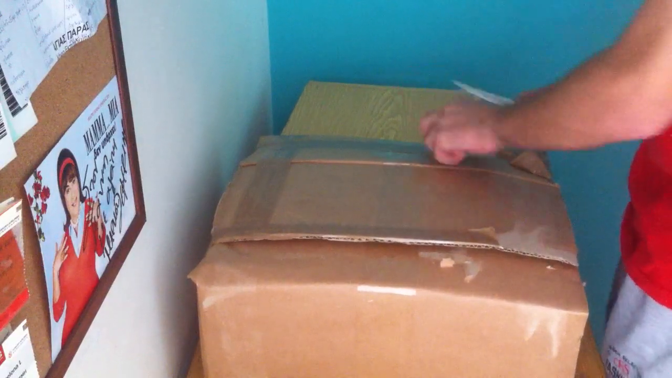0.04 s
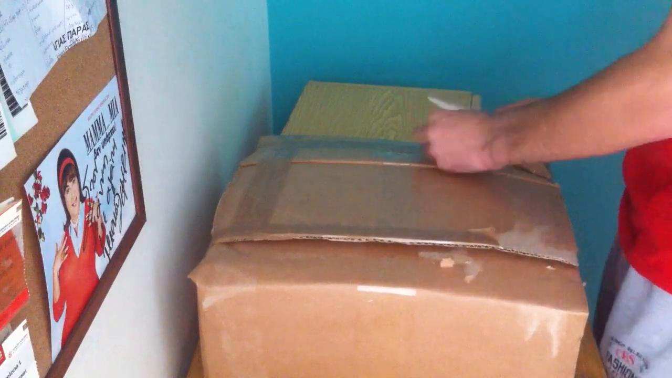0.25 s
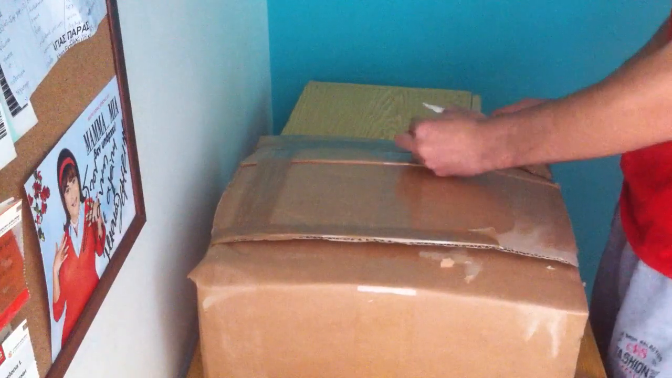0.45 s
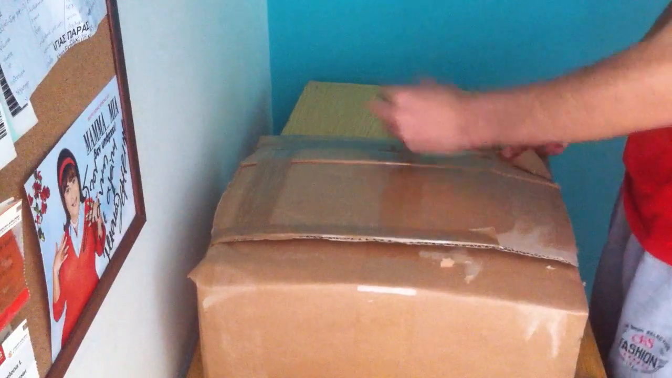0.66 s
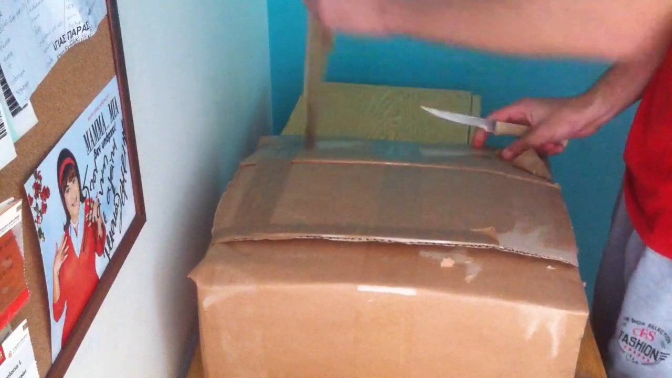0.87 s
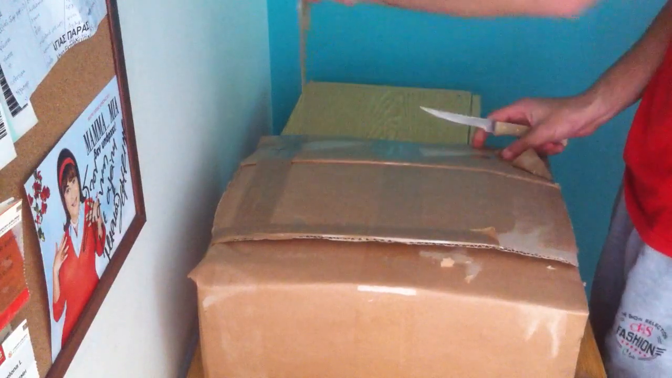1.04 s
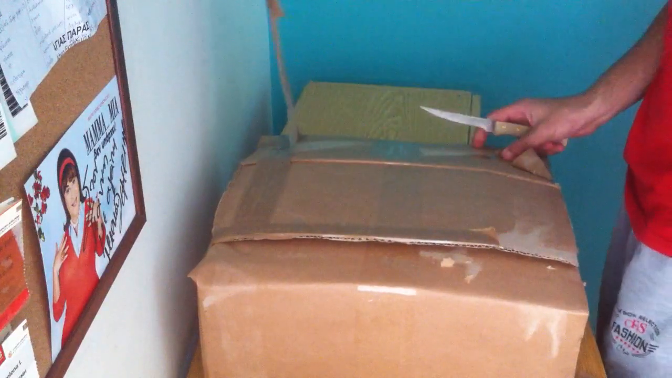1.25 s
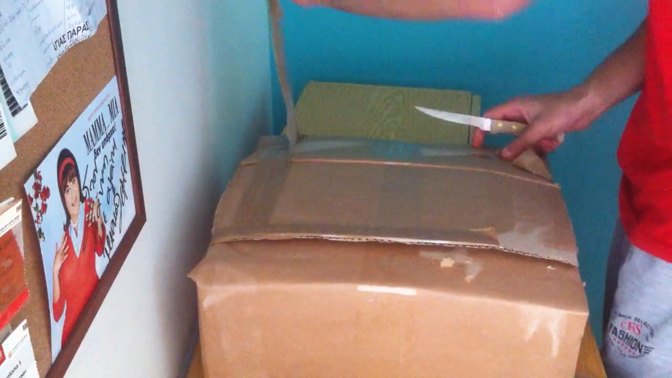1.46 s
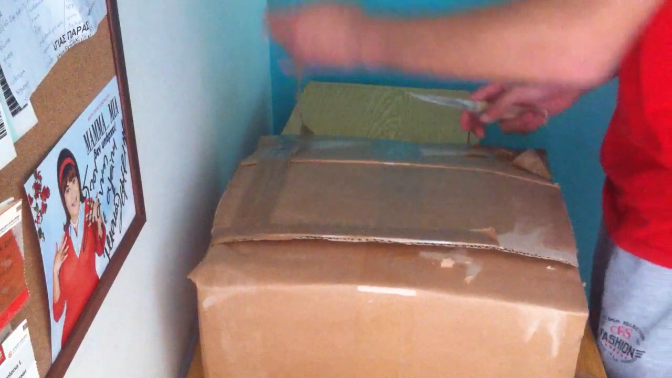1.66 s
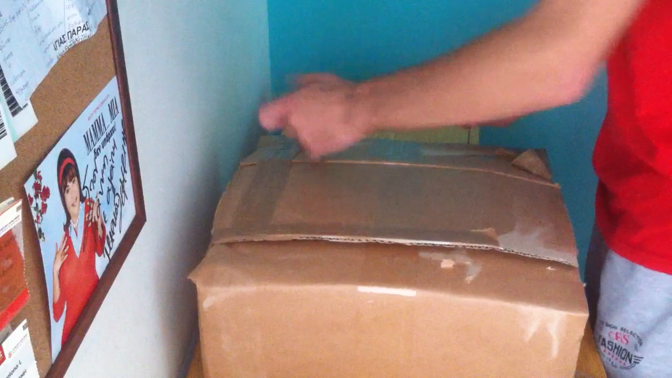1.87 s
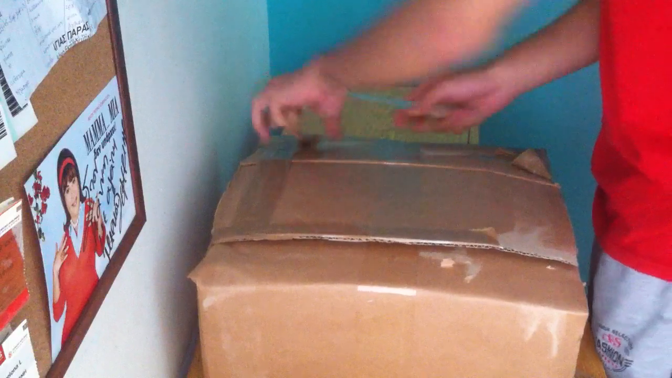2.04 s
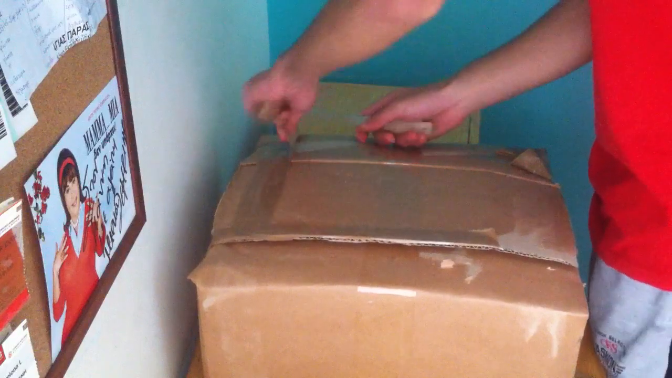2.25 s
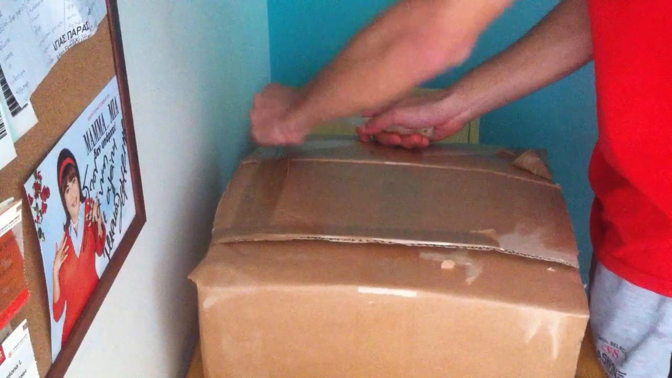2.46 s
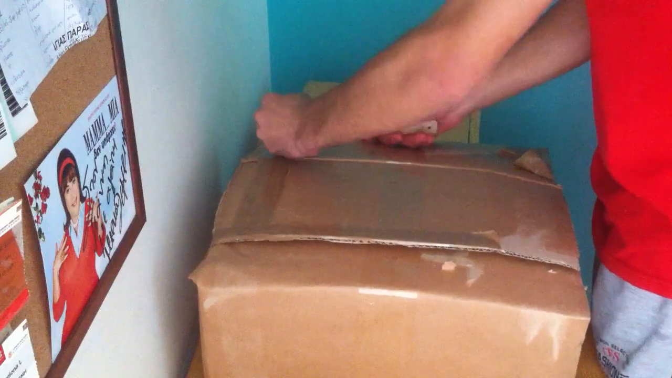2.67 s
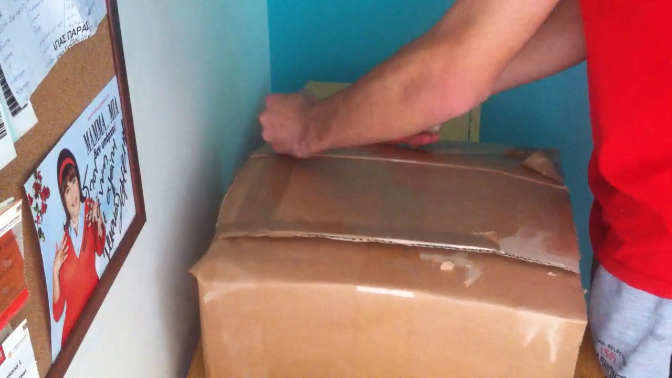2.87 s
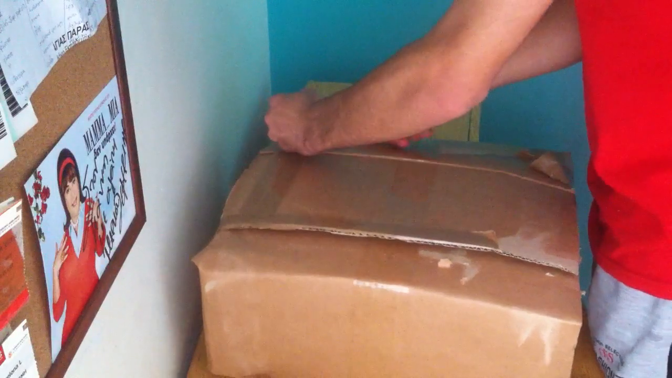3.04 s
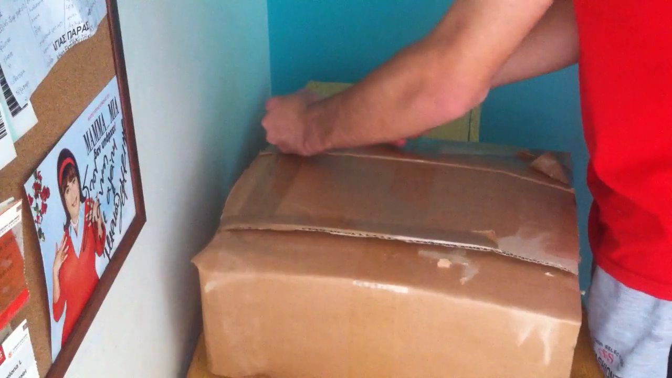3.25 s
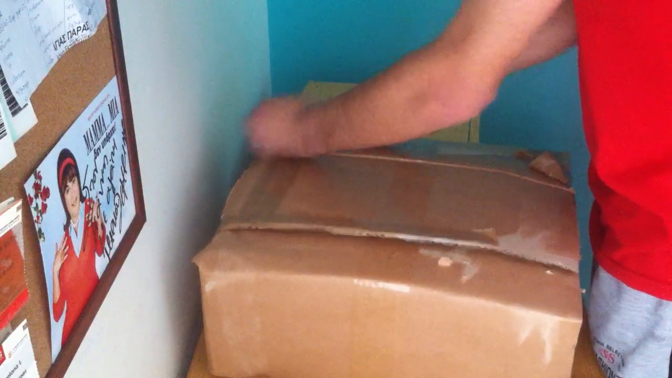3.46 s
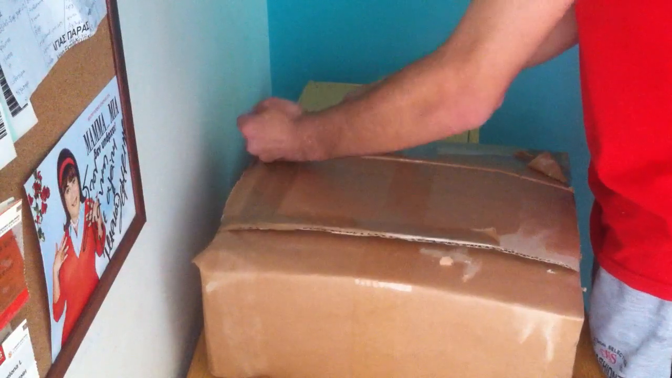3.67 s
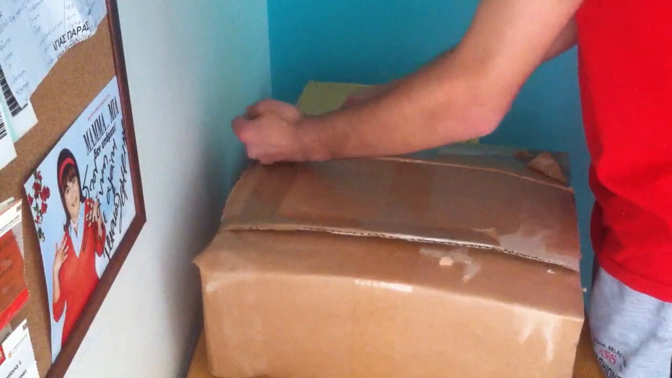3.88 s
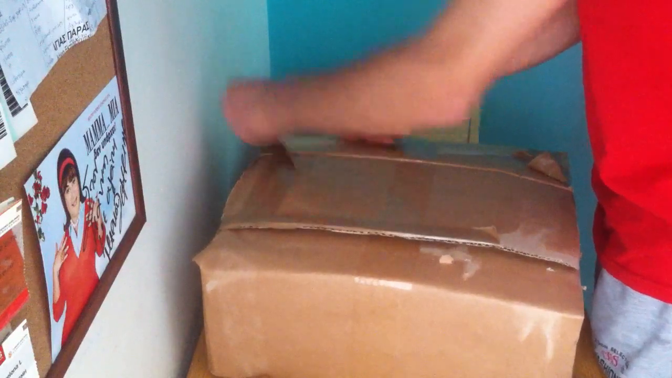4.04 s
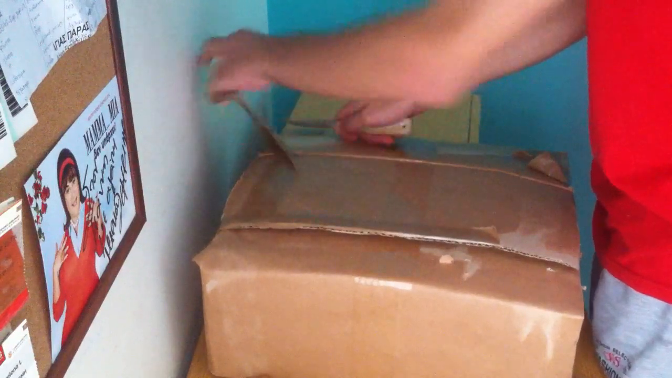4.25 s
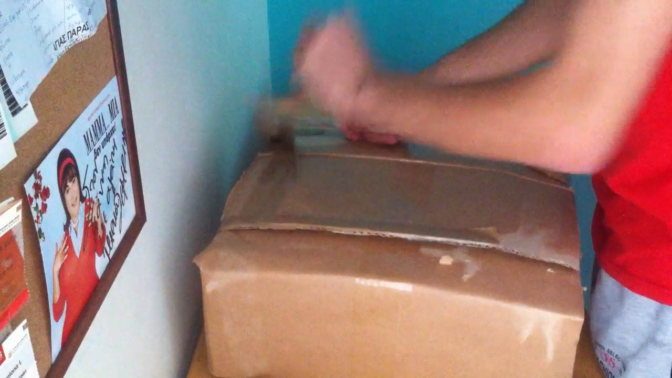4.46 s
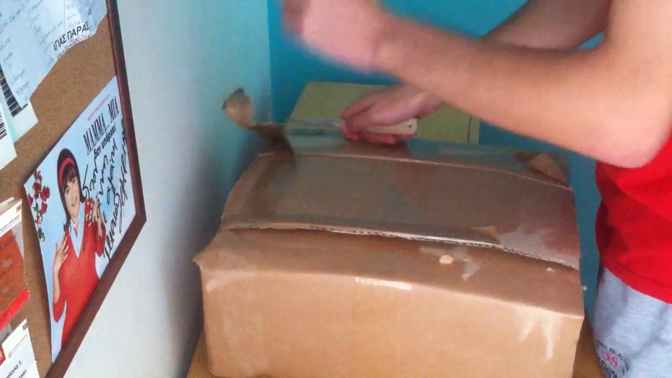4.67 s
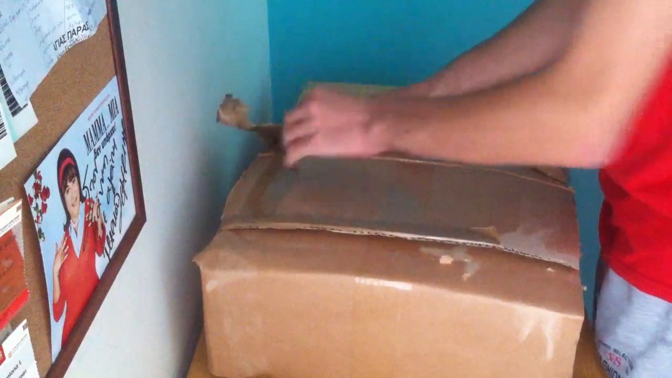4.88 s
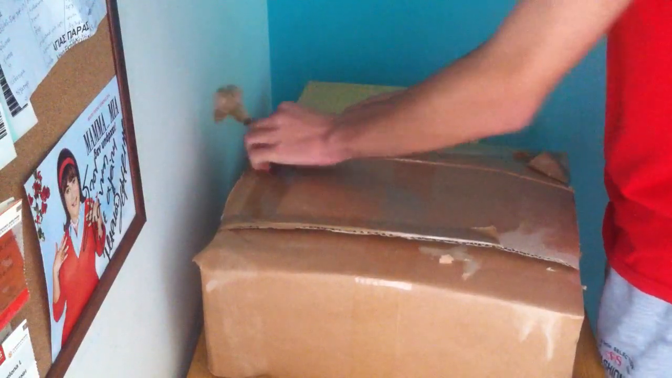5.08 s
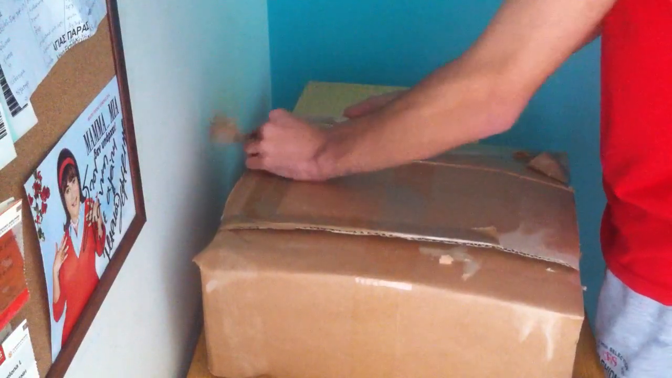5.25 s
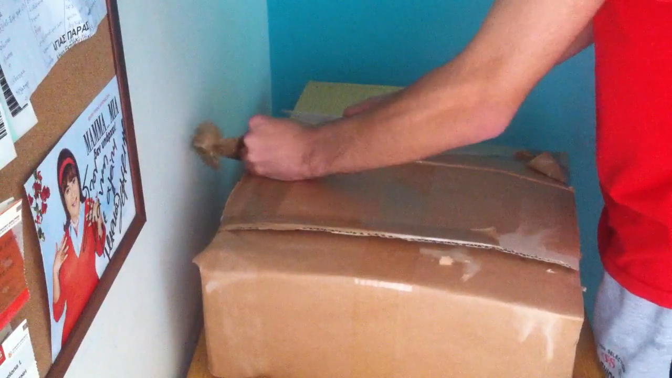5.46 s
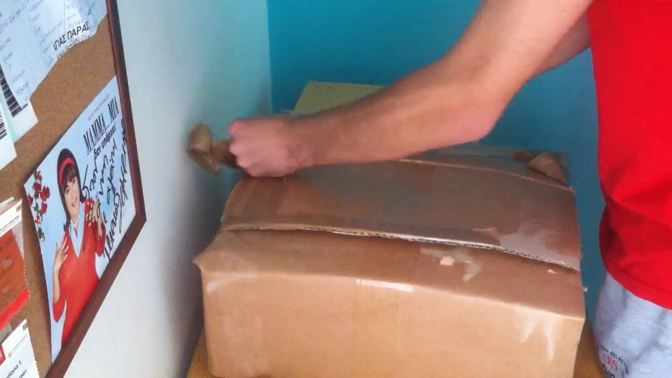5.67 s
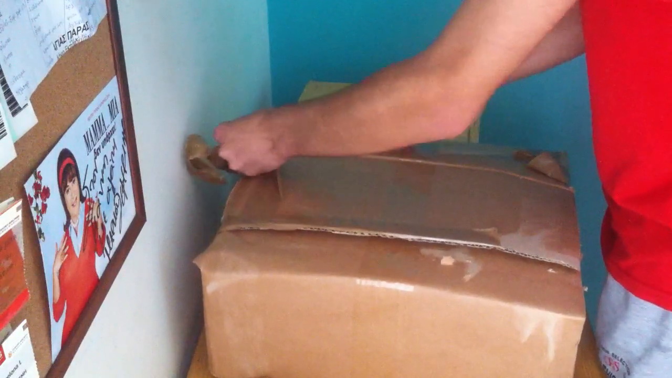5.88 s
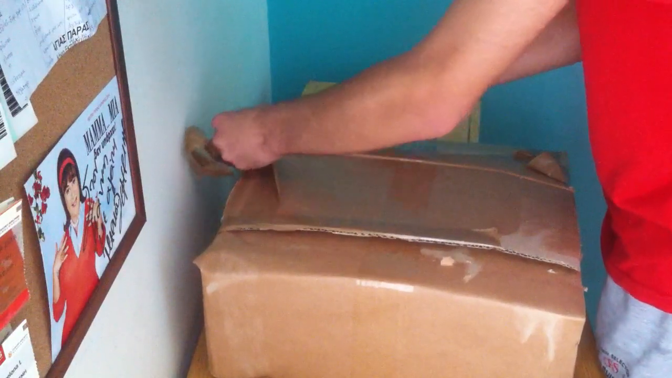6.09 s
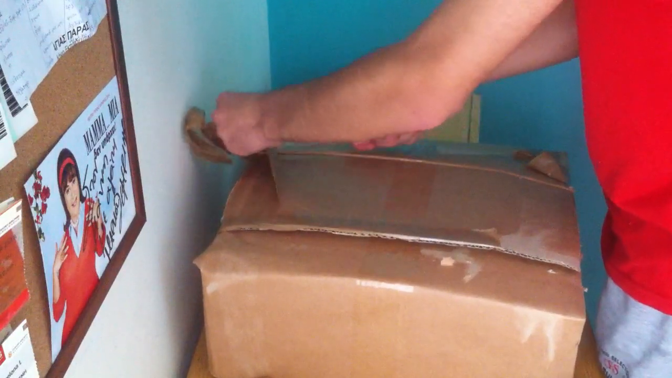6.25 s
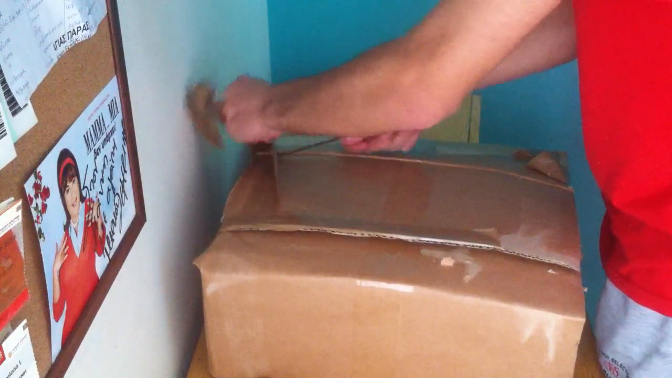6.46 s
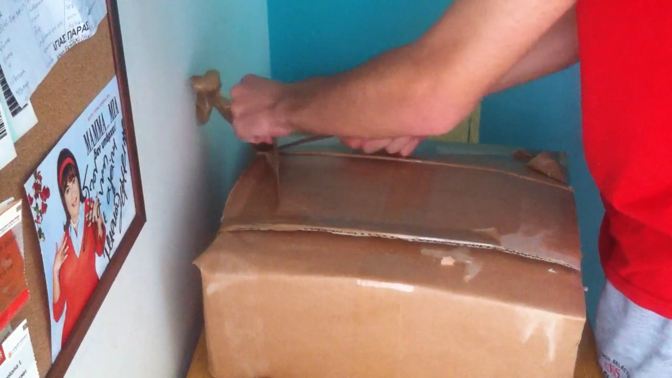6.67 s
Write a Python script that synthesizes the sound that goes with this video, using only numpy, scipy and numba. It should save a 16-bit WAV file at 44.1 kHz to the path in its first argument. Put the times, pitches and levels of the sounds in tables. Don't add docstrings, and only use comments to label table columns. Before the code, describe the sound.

A sticky strip rasps off a hollow carton, first moderately, then in a harsh burst with cracking snaps. A tiny high squeak and hand slides fill a quieter spell of little crackles. Midway a single loud snap slams the box. Afterwards short rips, sharp ticks and muffled finger bumps come irregularly. Close small microphone, thin lows, light hiss, short ring from bare walls.

```python
import sys
import numpy as np
from scipy import signal
from scipy.fft import rfft, irfft
from scipy.io import wavfile
from numba import njit

SR = 44100
rng = np.random.default_rng(int(sys.argv[2]) if len(sys.argv) > 2 else 0)


def decibels_to_gain(level_db):
    exponent = np.asarray(level_db, float) / 20
    return 10 ** exponent


def wav_out(sig):
    wavfile.write(sys.argv[1], SR, np.round(np.clip(np.atleast_2d(sig).T, -1, 1) * 32767).astype(np.int16))


N = 296352


def rms_one(x):
    return x / np.sqrt(np.mean(x ** 2) + 1e-20)


def at_hz(points, hz):
    curve_hz, values = np.transpose(points)
    return np.interp(np.log(hz), np.log(curve_hz), values)


def bank(x, spectrum):
    size = 8192
    hz = np.arange(1, size // 2 + 2) * SR / size
    cepstrum = irfft(np.log(decibels_to_gain(at_hz(spectrum, hz))))
    cepstrum[1:size // 2] *= 2
    cepstrum[size // 2 + 1:] = 0
    response = irfft(np.exp(rfft(cepstrum)))
    return signal.oaconvolve(x, response)[:len(x)]


@njit
def glide(x, r, turn):
    y = np.zeros(len(x))
    for i in range(2, len(x)):
        y[i] = x[i] - x[i - 2] + 2 * r[i] * turn[i] * y[i - 1] - r[i] * r[i] * y[i - 2]
    return y


def resonance(x, hz, width_hz):
    r = np.exp(-np.pi * width_hz / SR) * np.ones(len(x))
    turn = np.cos(2 * np.pi * hz / SR) * np.ones(len(x))
    return glide((1 - r * r) / 2 * x, r, turn)


def hush():
    # (pitch_hz, level_db per Hz)
    hush_spectrum = [(12, -25), (20, -9), (34, -5), (53, -24), (134, 3), (234, 4.5), (301, -1), (759, -3.5),
                     (949, -6), (1260, -6.5), (5530, -11.5), (9400, -14), (10500, -16.5), (14700, -12.5),
                     (16000, -14.5)]
    hiss = bank(rng.standard_normal(N + SR), hush_spectrum)[SR:]
    return decibels_to_gain(-68.5) * rms_one(hiss)


def room(x):
    # (pitch_hz, time_to_fall_60_db_s)
    wall_decay = [(100, 0.82), (200, 0.34), (400, 0.24), (800, 0.33), (1840, 0.37), (4850, 0.34),
                  (12000, 0.3)]
    # (delay_s, level_db)
    bounces = [
        (.0026, -5),
        (.007, -5),
        (.013, -14.5),
        (0.018, -14.5),
        (0.045, -11.5),
    ]
    t = np.arange(SR + SR // 2) / SR
    hz, s, cells = signal.stft(rng.standard_normal(len(t)), SR, nperseg=512)
    hz = np.maximum(hz, 50)[:, None]
    decay_db = -60 * s / np.maximum(at_hz(wall_decay, hz), .05)
    tilt_db = -0.5 * np.log2(hz / 1000)
    tail = signal.istft(cells * decibels_to_gain(decay_db + tilt_db), SR, nperseg=512)[1][:len(t)]

    early = np.zeros(len(t))
    scatters = rng.standard_normal((len(bounces), SR // 50))
    for (delay_s, db), scatter in zip(bounces, scatters):
        i = round(delay_s * SR)
        smear = scatter * np.exp(-t[:len(scatter)] / 0.003)
        early[i:i + len(scatter)] += decibels_to_gain(db - 27.5) * smear
    response = decibels_to_gain(-30.0) * np.clip(t / 0.0017, 0, 1) * tail + early
    response[0] += .6
    return signal.fftconvolve(x, response)[:N]


def squeak():
    t = np.arange(N) / SR
    shape = np.exp(-((t - 1.705) / 0.012) ** 2)
    return decibels_to_gain(-67) * shape * rms_one(resonance(rng.standard_normal(N), 4070.0, 150))


def box(x, push_hz):
    # (pitch_hz, width_hz, level_db)
    panels = [(135.4, 35, -1), (173.35, 4.7, 7), (189, 17, 4), (258, 8.8, 7), (351.2, 55, -6),
              (447, 8.3, -32), (602, 74, 1.5)]
    pushed = resonance(x, push_hz, 200)
    out = decibels_to_gain(-4.5) * pushed
    for k, (hz, width_hz, db) in enumerate(panels):
        out += (-1) ** k * decibels_to_gain(db) * resonance(pushed, hz, max(width_hz, 8))
    return out


def strip(x, hz, width_hz, lid_db):
    ring = resonance(x, hz, width_hz)
    overtone = decibels_to_gain(-17.0) * resonance(x, 1.726 * hz, 2 * width_hz)
    lid = decibels_to_gain(lid_db) * resonance(x, 667.0, 170)
    flutter = decibels_to_gain(-11.5) * resonance(x, 1920.0, 1450)
    band = signal.butter(2, [300, 2300], "band", fs=SR, output="sos")
    return signal.sosfilt(band, ring + overtone + lid + flutter)


def dullness(crack_db):
    return np.clip((-40.5 - crack_db) / 16, 0, .9)


def crack(x, dull):
    # (pitch_hz, level_db per Hz)
    hard_release = [(450, -19.5), (900, -6.5), (1700, -8.5), (2700, -7), (3600, -11), (5000, -15),
                    (6800, -24.5), (8300, -23), (10800, -34.5), (14000, -38.5), (16000, -54.5)]
    bright = bank(x, hard_release)
    soft = signal.sosfilt(signal.butter(2, 3300, fs=SR, output="sos"), bright)
    return dull * soft + (1 - dull) * bright


def stroke(t, start_s, length_s):
    rise = (t - start_s) / 0.1
    fall = (start_s + length_s - t) / 0.44
    return np.clip(np.minimum(rise, fall) / length_s, 0, 1) ** 2


def movements(t):
    # (time_s, pull_db, strip_ring_hz)
    long_pulls = [
        [(.31, -65, 820), (.35, -50, 730), (.426, -42.5, 700), (.49, -47, 740), (.54, -53, 736), (.6, -50, 700),
         (.75, -49, 670), (.775, -44, 780)],
        [(.77, -37, 780), (.82, -31, 806), (.86, -29.5, 800), (.92, -39.5, 900), (1.0, -44.5, 740),
         (1.13, -50, 780), (1.24, -48.5, 1770), (1.34, -55.5, 1800), (1.5, -75, 900)],
    ]
    # (start_s, length_s, pull_db, crackle_over_pull_db, strip_ring_hz)
    peels = [(0.21, 0.069, -56.5, -17, 1010), (1.824, 0.24, -80, 16, 900), (2.08, 0.13, -81, -8, 1350),
             (2.29, .16, -58.5, -3, 900), (2.407, 0.26, -62, 5.5, 900), (2.534, 0.28, -72, 14, 1150),
             (2.748, 0.22, -63, -20, 1000), (2.963, .18, -79, 16.5, 1260), (3.35, 0.5, -76, 7.5, 900),
             (3.589, 0.1, -43, 6, 640), (4.0, 0.1, -67.5, 4.5, 1300), (4.105, 0.097, -53, -15, 1020),
             (4.169, 0.082, -35.5, -27, 1000), (4.38, 0.32, -60.5, -25, 800), (4.572, 0.074, -43, -14, 756),
             (4.78, 0.078, -57, -13, 2010), (5.2, 0.23, -59, -9, 1100), (5.372, 0.18, -55.5, -3, 900),
             (5.571, 0.056, -53, -6, 1160), (5.627, 0.085, -47.5, -4, 670), (5.76, 0.23, -54, -5.5, 1670),
             (5.964, 0.11, -57, -6, 1130), (6.265, 0.062, -58, -9, 1040), (6.564, 0.11, -57.5, -8, 1050)]
    # (start_s, length_s, drumming_db, pushed_panel_hz)
    rubs = [(1.476, 0.069, -70, 215), (1.664, 0.12, -68, 232), (1.855, 0.42, -76, 200),
            (2.31, 0.066, -71, 140), (2.536, 0.056, -58, 300), (2.655, 0.033, -55, 330),
            (3.5, 0.3, -64, 325), (3.725, 0.16, -45, 173), (3.843, 0.2, -61, 170), (4.241, 0.1, -43, 323),
            (4.758, 0.05, -48, 400), (4.664, 0.11, -51.5, 160), (4.838, 0.12, -50, 145),
            (5.0, 0.078, -64, 179), (5.147, 0.029, -66, 228), (5.382, 0.27, -54.5, 294),
            (5.66, 0.047, -41.5, 272), (5.723, 0.1, -58, 256), (6.414, 0.061, -54.5, 287),
            (6.568, 0.081, -60.5, 297)]
    peel_drum_db, peel_push_hz = -2, 372
    rub_ring_db, rub_ring_hz = -32.5, 900.0
    for pull in long_pulls:
        s, db, hz = np.transpose(pull)
        db, hz = np.interp(t, s, db), np.interp(t, s, hz)
        fade = np.clip(np.minimum(t - s[0], s[-1] - t) / .012, 0, 1)
        yield fade, db + peel_drum_db, db, db - 5.5, hz, peel_push_hz
    for s, length_s, db, crackle_db, hz in peels:
        yield stroke(t, s, length_s), db + peel_drum_db, db, db + crackle_db, hz, peel_push_hz
    for s, length_s, db, hz in rubs:
        yield stroke(t, s, length_s), db, db + rub_ring_db, db + 3 * rub_ring_db, rub_ring_hz, hz


def ticks(per_s, spread_db, clump_db):
    slow = np.exp(-2 * np.pi * 30 / SR)
    clumps = rms_one(signal.lfilter([1], [1, -slow], rng.standard_normal(N)))
    born = rng.random(N) < per_s * decibels_to_gain(clump_db * clumps) / SR
    size_db = spread_db * np.minimum(rng.exponential(1, N), 4)
    return born * decibels_to_gain(size_db) * rng.choice([-1, 1], N) + 1e-18


def peeling():
    t = np.arange(N // 32 + 2) * 32 / SR
    gains = np.full((3, len(t)), 1e-7)
    weighted = np.full((2, len(t)), 5e-5)
    for shape, drum_db, ring_db, crackle_db, ring_hz, push_hz in movements(t):
        gains += shape * decibels_to_gain(np.array([drum_db, ring_db, crackle_db]).reshape(3, -1))
        weighted += [shape * decibels_to_gain(ring_db) * ring_hz, shape * decibels_to_gain(drum_db) * push_hz]
    dull = dullness(0.54 * 20 * np.log10(gains[2]) - 12)
    controls = [*gains, weighted[0] / gains[1], weighted[1] / gains[0], dull]
    every_sample = [np.interp(np.arange(N) / SR, t, c) for c in controls]
    drum_gain, ring_gain, crackle_gain, ring_hz, push_hz, dull = every_sample

    slips = ticks(1500., spread_db=1.5, clump_db=3.0)
    drum = rms_one(box(slips, push_hz))
    ring = rms_one(strip(slips, ring_hz, 240 * (ring_hz / 800) ** 1.25, lid_db=4.0))
    crackle = rms_one(crack(slips, dull))
    return decibels_to_gain(-8.5) * drum_gain * drum + decibels_to_gain(-10) * ring_gain * ring + decibels_to_gain(-9.5) * crackle_gain * crackle


def snaps():
    # (time_s, strip_ring_db, strip_ring_hz, thump_db, crack_db)
    sudden_snaps = [(.428, -39.5, 670, -83, -48), (.594, -42, 650, -51, -62), (.774, -43, 740, -36.5, -42),
                    (.825, -24.5, 1154, -17, -55), (.832, -28.5, 740, -34, -28),
                    (.861, -25, 1097, -43, -25), (2.079, -60, 1580, -79, -57.5),
                    (2.279, -53, 696, -47.5, -63), (2.323, -46, 707, -52, -61),
                    (2.602, -63, 1130, -74, -41.5), (3.6014, -38, 425, -17.5, -15),
                    (4.136, -43.5, 850, -55, -73), (4.168, -36.5, 543, -47, -29),
                    (4.195, -35, 1063, -40, -57), (4.449, -51.5, 766, -55, -62),
                    (4.584, -46, 420, -35, -36), (4.791, -44, 890, -36, -82), (5.459, -52, 1483, -64, -53),
                    (5.555, -47.5, 407, -62, -49), (5.64, -31, 1870, -59, -32), (5.646, -31, 686, -30, -38),
                    (5.945, -40.5, 860, -71, -45.5), (6.166, -46.5, 462, -61, -60),
                    (6.25, -41.5, 662, -54, -47.5)]
    # (time_s,
    # thump_db, pushed_panel_hz, strip_ring_db)
    knocks = [(0.189, -47, 258, -77), (2.356, -49, 149, -70), (3.647, -39, 160, -32), (1.68, -61, 213, -60),
              (1.848, -58, 179, -59), (2.134, -67, 213, -62), (2.514, -42.5, 346, -58),
              (4.686, -41, 164, -46), (5.143, -50, 254, -74), (5.229, -56, 258, -65),
              (5.39, -47.5, 252, -57), (5.488, -43, 347, -48), (6.428, -58, 300, -64),
              (6.563, -48.5, 330, -65)]
    snap_push_hz = 383
    knock_ring_hz, knock_crack_db = 700.0, -44.5
    size = SR // 10
    t, out = np.arange(size) / SR, np.zeros(N + size)
    hits = [(*row, snap_push_hz) for row in sudden_snaps]
    for s, db, hz, ring_db in knocks:
        hits.append((s, ring_db, knock_ring_hz, db, db + knock_crack_db, hz))
    tearing = rng.standard_normal((len(hits), size))
    for noise, (s, ring_db, hz, thump_db, crack_db, push_hz) in zip(tearing, hits):
        dull = dullness(crack_db)
        swell = 1 - np.exp(-t / (0.00013 + 0.0014 * dull))
        tear = noise * np.exp(-t / (0.0047 + 0.0031 * dull)) * swell
        release = (t == 0) * (1 - dull)
        jolt = release + 0.022 * tear
        click = release + (.075 + 0.13 * dull) * tear
        parts = strip(jolt, hz, 74, lid_db=-16.5), box(jolt, push_hz), crack(click, dull)
        levels = decibels_to_gain([ring_db + 3.5, thump_db - 1.0, crack_db + 7.5])
        i = round(s * SR)
        for level, part in zip(levels, parts):
            out[i:i + size] += level * part / np.max(np.abs(part))
    return out[:N]


def scene():
    source = squeak() + peeling() + snaps()
    near = signal.sosfilt(signal.butter(1, 900, fs=SR, output="sos"), source)
    return (room(source) + decibels_to_gain(-5.0) * near)[None]


def low_pass(x):
    return signal.sosfilt(signal.butter(12, 16300, fs=SR, output="sos"), x)


def record(dry):
    cut = signal.sosfilt(signal.butter(8, 119, "high", fs=SR, output="sos"), dry)
    leak = decibels_to_gain(-27) * dry
    return low_pass(cut + leak + hush())


dry = scene()
out = record(dry)
wav_out(out)
```